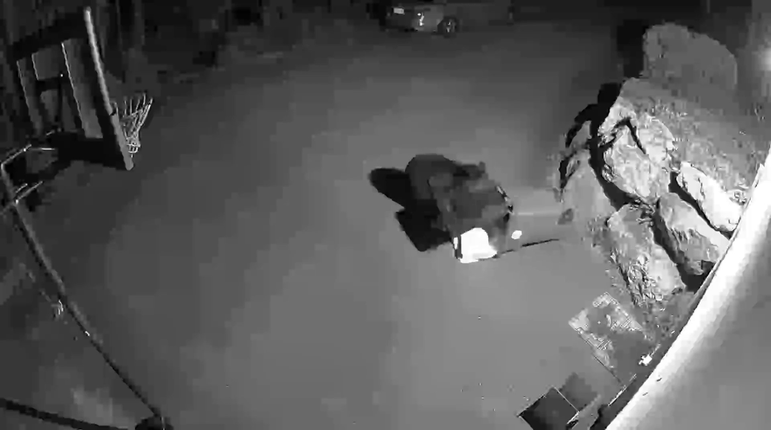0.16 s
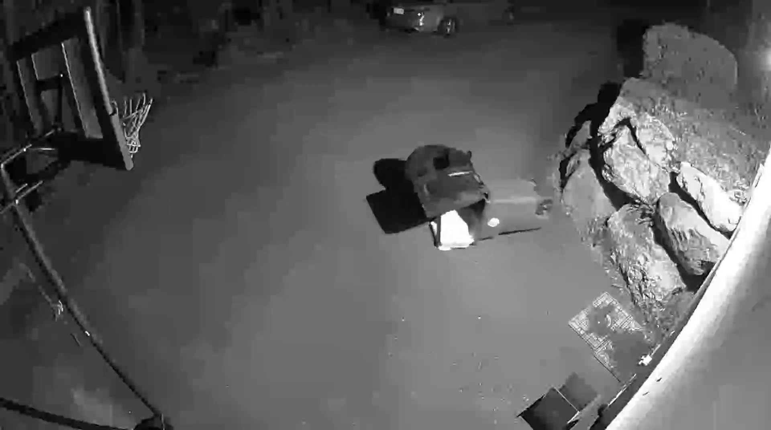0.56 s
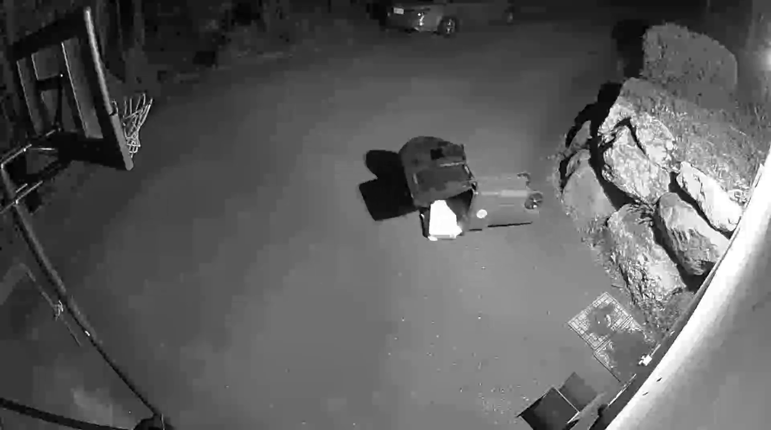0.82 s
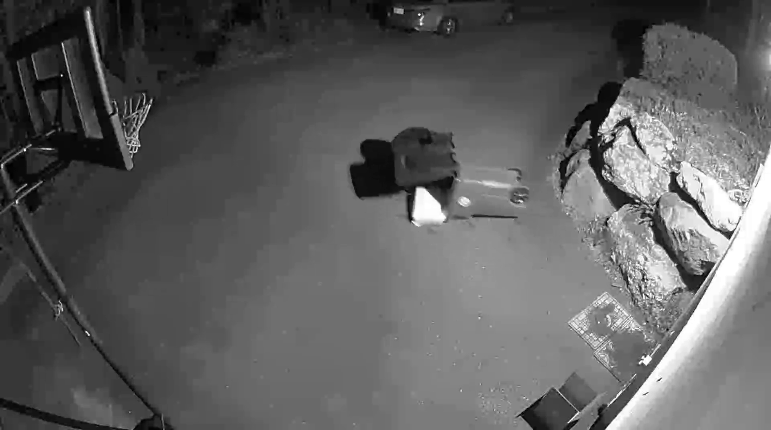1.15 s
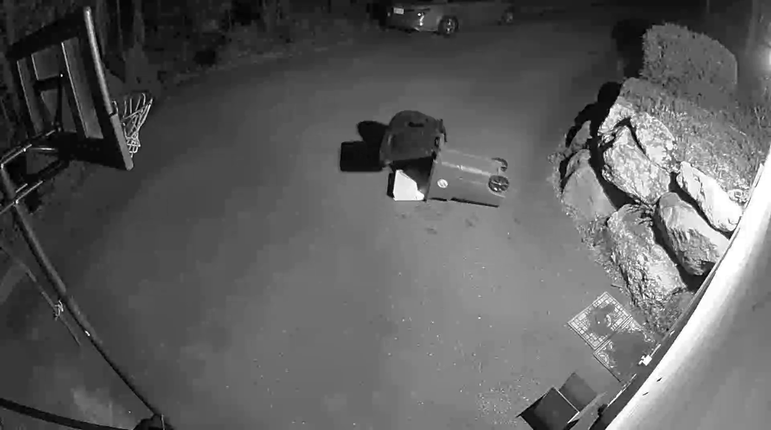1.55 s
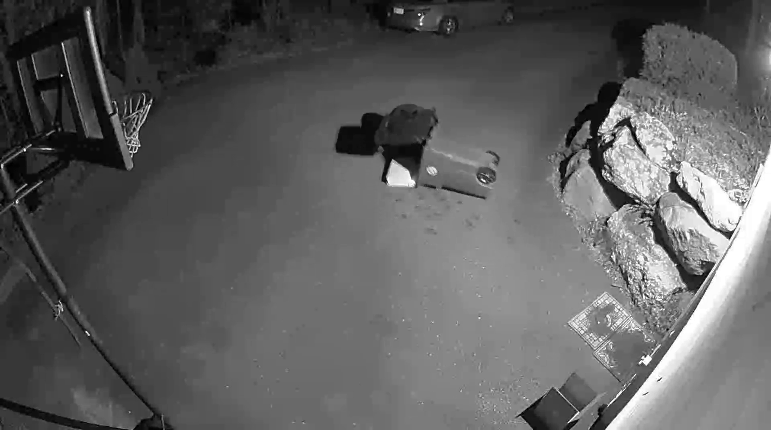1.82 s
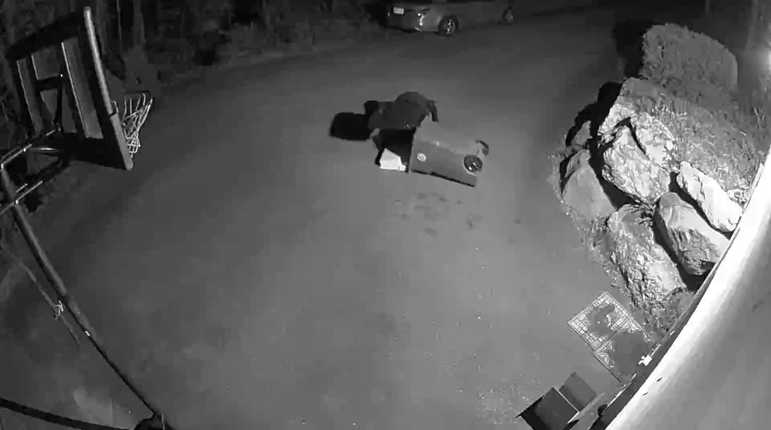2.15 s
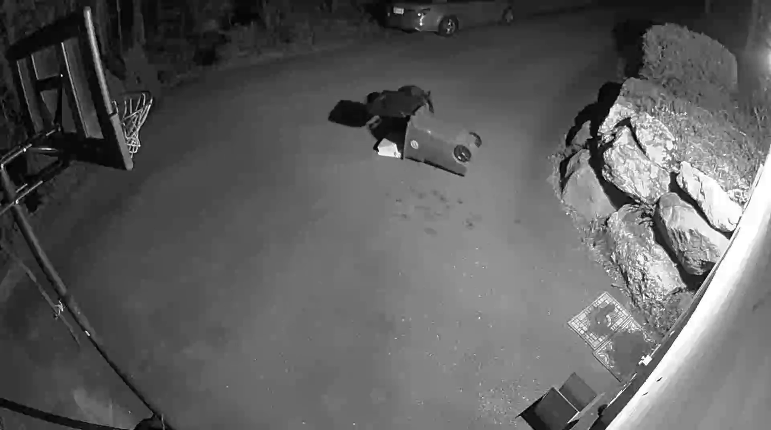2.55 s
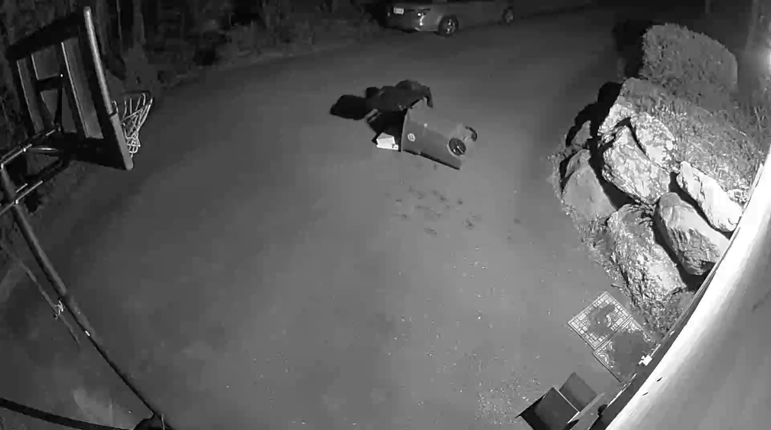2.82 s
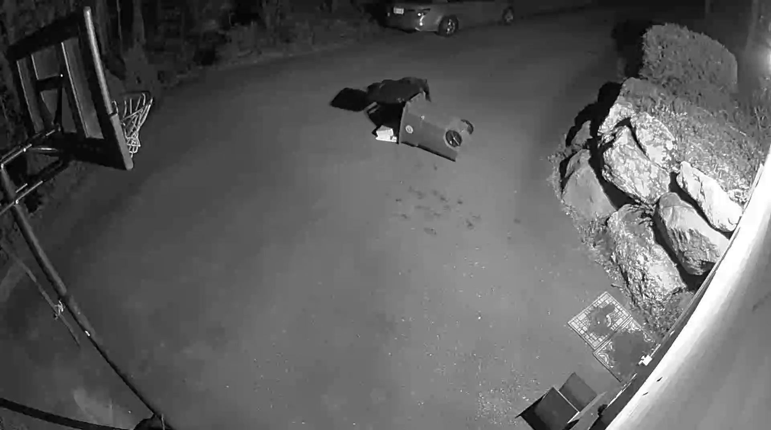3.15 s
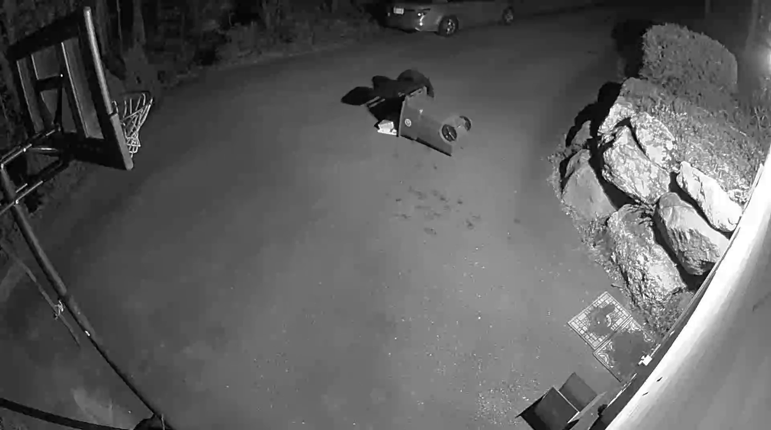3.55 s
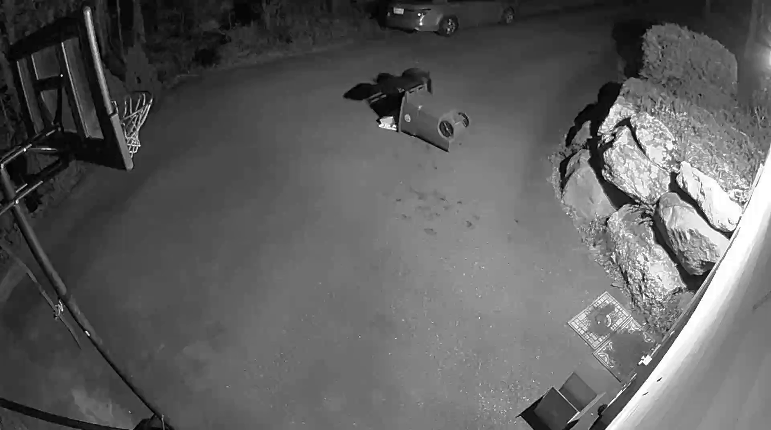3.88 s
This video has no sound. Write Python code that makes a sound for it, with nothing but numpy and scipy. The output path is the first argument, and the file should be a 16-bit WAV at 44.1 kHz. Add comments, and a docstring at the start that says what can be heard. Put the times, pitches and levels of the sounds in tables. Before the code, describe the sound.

A hollow plastic trash bin is dragged in jerks over gritty pavement, rumbling, scraping and knocking, with crunchy bursts and ticks; it weakens and fades out. Quiet night driveway, small wall camera microphone metres away.

```python
"""Gritty pavement in front of a house at night: a plastic bin on its side is dragged in jerks, metres away.
Random bumps ring the wall and drum modes of its hollow body, while filtered grains make the grit rasp.
Noise bursts scuff and tick, short pushes knock and soft blips pop;
the whole sound fades out at the end, over faint night air.
A small wall camera hears it; its microphone port rings near 2 and 3 kHz with a narrow gap between."""
import sys
import numpy as np
from scipy import signal
from scipy.fft import rfft, irfft
from scipy.io import wavfile
from scipy.ndimage import uniform_filter1d

SR = 44100
rng = np.random.default_rng(int(sys.argv[2]) if len(sys.argv) > 2 else 0)


def level_to_linear(level):
    """Convert decibel levels to linear amplitude factors, elementwise."""
    exponent = np.asarray(level, float) / 20
    return 10 ** exponent


def waveform_to_disk(signal):
    """Save audio, clipped to [-1, 1], as 16-bit WAV at the path in sys.argv[1]."""
    frames = np.transpose(np.atleast_2d(signal))
    scaled = np.clip(frames, -1, 1) * 32767
    samples = np.round(scaled).astype(np.int16)
    wavfile.write(sys.argv[1], SR, samples)


N = 176400  # samples, 4 s

# Course of the drag, levels before echoes and port: (time [s], wall rumble [dB], deep drumming [dB],
# coarse grit [dB], upper wall ring [dB], fine grit [dB])
DRAG_COURSE = [(0, -58, -57, -62, -67, -66), (.15, -54, -65, -53, -61.5, -57),
               (.29, -48, -47, -57.5, -50.5, -57.5), (.34, -54, -55.5, -54.5, -59, -56),
               (.57, -53, -57, -57, -65, -62.5), (0.649, -60.5, -66.5, -60, -74, -62),
               (0.929, -60.5, -61.5, -57.5, -68.5, -58.5), (1.002, -47.5, -51, -50, -59.5, -52.5),
               (1.1, -50, -50, -50, -52.5, -53.5), (1.261, -51.5, -51.5, -57, -60.5, -59.5),
               (1.331, -63, -61, -59.5, -67, -61.5), (1.55, -56.5, -63, -56.5, -67, -59.5),
               (1.69, -49.5, -60, -49.5, -56, -53), (1.78, -52, -52, -56, -62, -57.5),
               (1.81, -49, -52, -56, -51, -58), (1.93, -52, -54, -58, -54, -60),
               (1.959, -62.5, -58.5, -60, -80, -61), (2.05, -65, -64.5, -62.5, -79, -62),
               (2.26, -61, -65, -62, -75, -63), (2.3, -59.5, -48, -58.5, -58, -52),
               (2.339, -49.5, -56, -56, -56.5, -56), (2.47, -58.5, -56, -58.5, -72.5, -58.5),
               (2.57, -53.5, -58, -54.5, -60.5, -58), (2.749, -61, -65, -63, -80, -61.5),
               (2.818, -53, -52, -57, -64, -57.5), (3.13, -59, -65, -62, -70.5, -62),
               (3.19, -67.5, -62.5, -64, -78, -63), (3.246, -52, -62, -61.5, -77, -59.5),
               (3.38, -71.5, -71.5, -62, -73, -62.5), (3.42, -60, -64, -62.5, -76, -60.5),
               (3.56, -65, -65.5, -63.5, -82, -65), (4, -82.5, -83.5, -82, -82, -78)]
# Short crunches over grit: (time [s], level before the common trim [dB],
# treble tilt before the common lift [dB/octave], rattle pitch [Hz], hold [ms], swell time constant [ms])
SCUFF_EVENTS = [(.148, -36.5, -2, 3360, 6.7, 4), (0.296, -38.5, -20, 4300, 18, 0.56),
                (.4262, -37.5, -1.5, 4400, 25, 0.43), (.45, -41.5, -9, 3970, 2, 2.5),
                (.483, -41, -1, 3330, 11, 0.46), (.614, -42.5, -11, 3470, 11, 1),
                (.694, -44.5, -6.5, 2920, 17, 1), (1.004, -25, -6.5, 3580, 14.6, 0.99),
                (1.044, -30.5, 0, 3300, 10.5, 3.4), (1.3955, -41, -3, 3320, 5.2, .4),
                (1.4525, -36.5, -3, 3220, 2.6, 0.3), (1.597, -32.5, -9, 3060, 12.6, 7),
                (1.66, -36, -13, 3350, 12.5, 5.4), (1.683, -31, -6, 4530, 2.1, 2.8),
                (1.709, -44, 1, 3200, 15, 2.2), (1.771, -35, -5, 3280, 4.9, 2.3),
                (2.2817, -31, -2.5, 3000, 11, .3), (2.307, -34.5, -2.5, 5860, 17, 2),
                (2.383, -39, -5, 3710, 12, 1.1), (2.507, -36, -2.5, 3180, 6, .3),
                (2.582, -32.5, -6, 3000, 12.5, .4), (2.609, -36, 0.5, 3140, 5.8, 2),
                (2.645, -38.5, -2.5, 3150, 3, .3), (2.779, -25, -2, 2980, 11.2, 3.8),
                (3.018, -43, -11.5, 2960, 5, 4), (3.059, -37.5, 5, 2880, 17, 4.2),
                (3.08, -41, -9, 5150, 16, 5.9), (3.1118, -31.5, 1, 3020, 13, .3),
                (3.131, -36.5, -3, 4900, 6.9, 1.5), (3.217, -40.5, -9, 5100, 9, .3),
                (3.235, -36, -3, 3130, 2.3, 4.1), (3.2528, -29.5, -5.5, 3440, 4.6, 2.5),
                (3.396, -40, -1.5, 3120, 16, .5), (3.4376, -39, -7.5, 2800, 3.8, 0.23),
                (3.759, -44.5, -0.5, 2950, 19, 1.4), (3.896, -54.5, -10, 2960, 4.5, 1.6)]
# Knocks of the body on bumps: (time [s], peak before the common trim [dB], centre of the rung modes [Hz])
KNOCK_EVENTS = [(0.222, -32.5, 696), (0.264, -31, 721), (0.295, -24, 583), (0.4065, -34, 528),
                (0.429, -34, 646), (0.482, -37, 633), (0.54, -35, 872), (0.619, -40, 690),
                (0.815, -50, 507), (1.004, -32.5, 533), (1.058, -33, 800), (1.1, -32.5, 505),
                (1.462, -37, 660), (1.804, -32.5, 603), (1.863, -33.5, 1160), (1.893, -39.5, 1100),
                (1.919, -41.5, 1100), (2.28, -33.5, 581), (2.318, -33, 455), (2.344, -33.5, 656),
                (2.51, -39, 393), (2.543, -41.5, 347), (2.588, -38.5, 595), (2.645, -56, 678),
                (2.78, -33, 640), (3.003, -41, 700), (3.214, -42, 388), (3.249, -38.5, 705),
                (3.408, -41, 240), (3.436, -39.5, 690), (3.763, -55.5, 614)]
# Small hollow pops, something loose inside: (time [s], level before the blip's shape [dB], pitch [Hz])
POP_EVENTS = [(3.183, -41.5, 909), (3.326, -47.5, 803)]
# Single stones cracking under the rim: (time [s], level before the common trim [dB], pitch [Hz])
TICK_EVENTS = [(0.4258, -31, 7800), (0.4395, -38, 7740), (0.538, -45, 7500), (0.618, -41, 6300),
               (0.801, -38.5, 7660), (1.0042, -30, 5850), (1.453, -42, 5600), (1.597, -31, 5370),
               (1.6045, -39, 7700), (1.712, -39.5, 6280), (1.7982, -37.5, 6560), (2.2797, -27.5, 5600),
               (2.383, -38, 6140), (2.4124, -40, 7210), (2.6442, -43, 5260), (2.753, -38, 6000),
               (2.7806, -44, 5100), (3.079, -42, 5960), (3.1113, -41, 5550), (3.2163, -43.5, 5600),
               (3.254, -35.5, 7300), (3.3948, -38, 5870), (3.438, -35, 7600), (3.7665, -51, 6800),
               (3.774, -48, 4800)]
# Wall modes of the bin: (frequency [Hz], relative level [dB], decay by 60 dB [s])
WALL_MODES = [(251, -14.5, 0.04), (306, -13.5, 0.015), (341.2, 2, 0.065), (410.7, -5.5, 0.032),
              (506.5, 1.5, 0.07), (610.5, -2, 0.057), (680, 0, 0.037), (822, -5.5, 0.027), (943, -2, 0.026),
              (1140, 2, 0.041), (1225, -9.5, 0.01)]
# Drum modes of the hollow body: (frequency [Hz], relative level [dB], decay by 60 dB [s])
DRUM_MODES = [(60, 1, 0.053), (89.5, 1.5, 0.059), (112, 2, 0.18), (171.5, 1, 0.055)]
# Colour of the grit: (frequency [Hz], relative density [dB per Hz])
GRIT_COLOUR = [(200, 8), (700, -16), (1500, -9), (2500, -0.5), (3800, -3), (5000, -7.5), (7400, -10.5),
               (8200, -4.5)]
# Reflections from ground, rocks and house front: (delay [s], level against the direct sound [dB])
ECHO_PATHS = [(.007, -23.5), (.019, -23.5), (.034, -26)]
# Colour of the night air: (frequency [Hz], relative density [dB per Hz])
NIGHT_COLOUR = [(24, -37.5), (40, 1.5), (337, -8), (1210, -15.5), (1450, -20), (2210, -9), (6950, -12.5),
                (8500, -27), (11000, -45), (18700, -120)]
# Peaks and gap of the microphone port: (frequency [Hz], width [Hz], gain [dB])
PORT_PEAKS = [(2040, 330, 9), (2435, 152, -13.5), (3140, 110, 2.5)]


def level(x, db=0):
    """Scale to an rms level in dB."""
    return x * level_to_linear(db) / np.sqrt(np.mean(x ** 2))


def colour(x, points):
    """Filter by (Hz, dB) points joined by straight lines on a log frequency axis."""
    hz, db = np.transpose(np.array(points, float))
    bins_hz = np.maximum(np.arange(len(x) // 2 + 1) * SR / len(x), 1)
    gain = level_to_linear(np.interp(np.log(bins_hz), np.log(hz), db))
    return irfft(rfft(x) * gain, len(x))


def ring(x, modes):
    """Sum of damped two-pole resonances, each near its dB at the peak, signs alternating."""
    out = 0
    for k, (hz, db, t60) in enumerate(modes):
        r = np.exp(-np.log(1000) / (t60 * SR))
        poles = [1, -2 * r * np.cos(2 * np.pi * hz / SR), r * r]
        out = out + (-1) ** k * level_to_linear(db) * (1 - r) * signal.lfilter([1, 0, -1], poles, x)
    return out


def grains(per_s, spread_db, size=N):
    """Random clicks of either sign at rms 1, a few much stronger than the rest."""
    u = rng.random((3, size))
    hit = np.clip((per_s / SR - u[0]) * 1e4, 0, 1)
    sign = np.sign(u[1] - .5)
    strength = level_to_linear(spread_db * np.minimum(-np.log(1 - u[2]), 6))
    return level(hit * sign * strength)


def walk(rate):
    """Slow random wobble of rms 1, gliding to a new value rate times a second."""
    k = int(SR / rate)
    steps = np.repeat(rng.standard_normal(N // k + 1), k)
    return level(uniform_filter1d(steps, k)[:N])


def drag(column):
    """One level column of the drag course as a smooth gain."""
    course = np.array(DRAG_COURSE)
    return level_to_linear(np.interp(np.arange(N) / SR, course[:, 0], course[:, column]))


def add(out, s, x):
    """Mix x in at s seconds."""
    i = max(int(s * SR), 0)
    out[i:i + len(x)] += x[:N - i]


def shake(modes):
    """Bumps ring a set of modes, each mode with its own bumps and flutter."""
    total = 0
    for mode in modes:
        bumps = grains(per_s=700, spread_db=1.5)
        flutter = level_to_linear(1.4 * walk(rate=49))
        total = total + ring(bumps * flutter, [mode])
    return level(total)


def rumble():
    """Bumps of the pavement shake the walls and the hollow body into damped resonance."""
    judder = level(level_to_linear(2.4 * walk(rate=45)))  # the rim catches and lets go
    walls = shake(WALL_MODES[:8]) * drag(column=1)
    upper_walls = shake(WALL_MODES[8:]) * drag(column=4)
    drumming = shake(DRUM_MODES) * drag(column=2)
    return judder * (walls + upper_walls) + drumming


def rasp():
    """Dense grit is crushed under the sliding plastic; every size of grit flutters on its own."""
    coarse, fine = 0, 0
    for hz in 250 * 2 ** np.arange(0, 5.3, .4):
        edges = [hz / 2 ** .2, hz * 2 ** .2]
        band = signal.butter(2, edges, "band", fs=SR, output="sos")
        grit = signal.sosfilt(band, grains(per_s=6000, spread_db=2.0))
        grit = grit * level_to_linear(2.2 * walk(rate=32))
        if hz < 4500:
            coarse = coarse + grit
        else:
            fine = fine + grit
    coarse = level(colour(coarse, GRIT_COLOUR)) * drag(column=3)
    fine = level(colour(fine, GRIT_COLOUR)) * drag(column=5)
    return coarse + fine


def scuffs():
    """Each scuff is a burst of grit with a plastic rattle on top: swell, hold, fast decay, weak tail."""
    trim_db, tilt_lift = -13, 1.5  # dB, dB/octave
    decay_t60, tail_t60, strike_t60, rattle_t60 = 0.042, 0.46, .02, 0.016  # s
    out, t = np.zeros(N), np.arange(8192) / SR - .03  # starts 30 ms early for the swell
    for s, db, tilt, hz, hold_ms, swell_ms in SCUFF_EVENTS:
        late = np.maximum(t - hold_ms / 1000, 0)
        swell = np.exp(np.minimum(t * 1000 / swell_ms, 0))
        decay = level_to_linear(-60 * late / decay_t60) + level_to_linear(-25.5 - 60 * late / tail_t60)
        # the first strike is stronger when the swell is short
        strike = (t >= 0) * level_to_linear(1.0 - 60 * np.abs(t) / strike_t60) / (1 + swell_ms)
        envelope = swell * decay + strike

        grit = grains(per_s=6000, spread_db=1.3, size=8192)
        patchy_db = 1.5 * rng.standard_normal(len(GRIT_COLOUR))
        shape = [(700, -31.5)]
        for (f, g), patch in zip(GRIT_COLOUR[2:], patchy_db):
            shape.append((f, g + patch + (tilt + tilt_lift) * np.log2(f / 3000)))
        crunch = level(colour(grit, shape))
        rattle = level(ring(grit, [(hz, 0, rattle_t60)]), db=-6.5)
        rattle = rattle * level_to_linear(-500 * np.maximum(t, 0))  # fades by 500 dB/s on top of the envelope
        add(out, s + t[0], (crunch + rattle) * envelope * level_to_linear(db + trim_db))
    return out


def ticks():
    """Stones crack as very short bright noise bursts around their own pitch."""
    octaves, t60, trim_db = .35, 0.013, -3.5  # octaves, s, dB
    out, t = np.zeros(N), np.arange(2048) / SR
    for s, db, hz in TICK_EVENTS:
        band = [(hz / 2 ** (2 * octaves), -24), (hz / 2 ** octaves, -6), (hz, 0), (hz * 2 ** octaves, -6)]
        crack = level(colour(rng.standard_normal(len(t)), band), db + trim_db)
        add(out, s, crack * level_to_linear(-60 * t / t60))
    return out


def knocks():
    """A short rattling push rings the wall modes near the knock's own pitch, and the drum modes weakly."""
    push_s, octaves, trim_db = 0.0042, 0.59, -5.5  # s, octaves, dB
    out, t = np.zeros(N), np.arange(8192) / SR
    for s, db, hz in KNOCK_EVENTS:
        push = t / push_s * np.exp(-2 * t / push_s) * rng.standard_normal(len(t))
        near_modes = [(f, g - 6 * (np.log2(f / hz) / octaves) ** 2, t60) for f, g, t60 in WALL_MODES]
        knock = ring(push, near_modes) + level_to_linear(-11.0) * ring(push, DRUM_MODES)
        add(out, s - 2e-3, knock / np.max(np.abs(knock)) * level_to_linear(db + trim_db))
    return out


def pops():
    """Something loose inside makes soft single-pitched blips, slightly roughened by slow noise."""
    out, t = np.zeros(N), np.arange(4096) / SR - .03
    for s, db, hz in POP_EVENTS:
        width_s = np.where(t < 0, 0.0038, 0.0053)  # rise, fall
        bell = np.exp(-(t / width_s) ** 2 / 2)
        rough = level(uniform_filter1d(rng.standard_normal(len(t)), size=60))
        add(out, s + t[0], level_to_linear(db) * bell * np.sin(2 * np.pi * hz * t) * (0.5 + 0.18 * rough))
    return out


def echoes(near):
    """Ground, rocks and house front return delayed, weaker copies."""
    out = np.zeros(N)
    for s, db in ECHO_PATHS:
        add(out, s, near * level_to_linear(db))
    return out


def night_air():
    """Faint steady noise, coloured as the night air."""
    return level(colour(rng.standard_normal(N), NIGHT_COLOUR), db=-79)


def scene():
    """The bin, its echoes and the night air, as one channel."""
    near = rumble() + rasp() + scuffs() + ticks() + knocks() + pops()
    return (near + echoes(near) + night_air())[None]


def port(x):
    """The microphone port boosts or cuts bands, one peaking filter for each resonance or gap."""
    for hz, width, db in PORT_PEAKS:
        a, w = level_to_linear(db / 2), 2 * np.pi * hz / SR
        q = np.sin(w) * width / hz / 2
        top = [1 + q * a, -2 * np.cos(w), 1 - q * a]
        bottom = [1 + q / a, -2 * np.cos(w), 1 - q / a]
        x = signal.lfilter(top, bottom, x)
    return x


def low_pass(x):
    """Removes everything above the highest recorded frequency."""
    return signal.sosfilt(signal.butter(12, 9020, fs=SR, output="sos"), x)


def record(dry):
    """The port rings, the bass is thinned and the treble is cut off low."""
    x = port(dry)
    x = signal.sosfilt(signal.butter(4, 47.7, "high", fs=SR, output="sos"), x)
    x = signal.sosfilt(signal.cheby2(12, 60, 9285, fs=SR, output="sos"), x)  # steep top edge
    x = signal.sosfilt(signal.butter(8, 7750, fs=SR, output="sos"), x)  # roll-off below it
    return low_pass(x)


dry = scene()
out = record(dry)
waveform_to_disk(out)
```